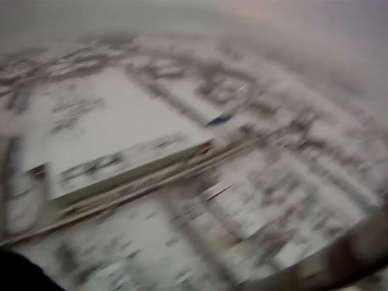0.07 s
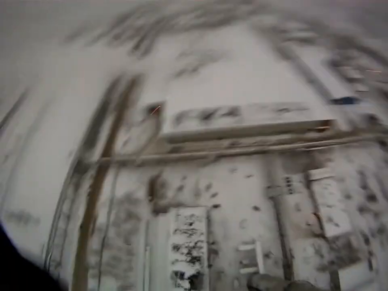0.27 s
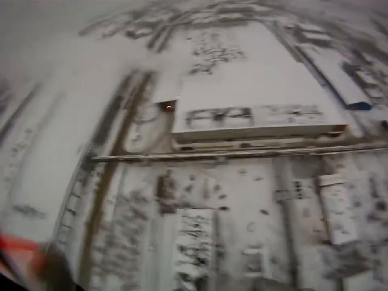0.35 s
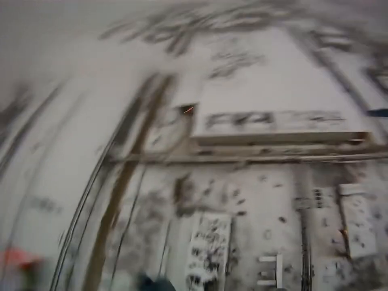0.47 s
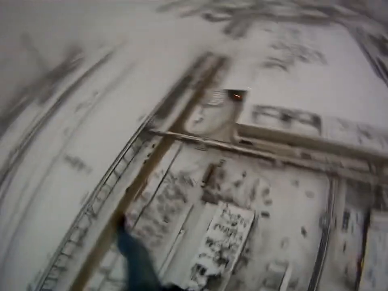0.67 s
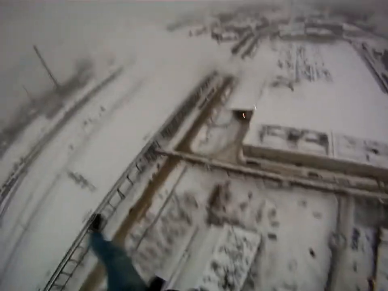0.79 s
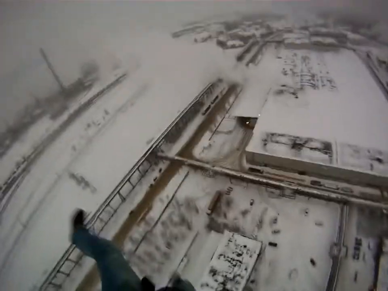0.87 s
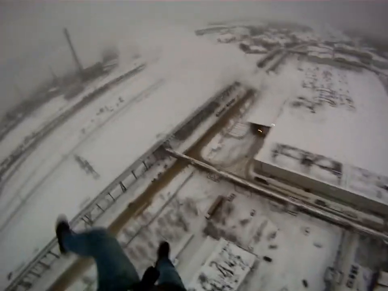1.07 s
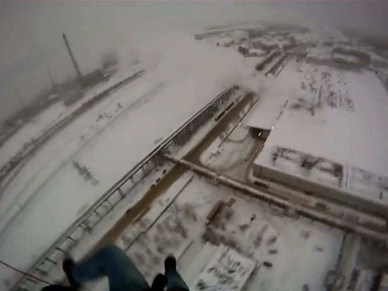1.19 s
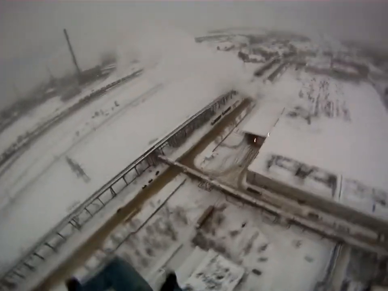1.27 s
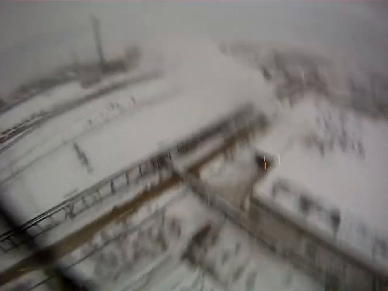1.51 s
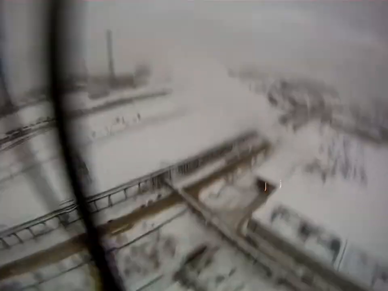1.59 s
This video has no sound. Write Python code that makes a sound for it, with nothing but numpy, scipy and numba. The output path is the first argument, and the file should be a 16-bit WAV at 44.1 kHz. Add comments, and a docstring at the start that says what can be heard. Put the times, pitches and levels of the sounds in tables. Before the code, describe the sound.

Wind swells quickly around a small cased camera worn in a jump, fabric crackling and fluttering; gear snaps sharply near half a second, a loud overloaded knock follows at 0.8, then a thinner steady rush outdoors.

```python
"""Wind swells past a small cased camera in a jump: shaped noise hisses in the case and buffets the mount.
From the start fabric crackles as noise bursts and clothing flutters as shaped noise; a two-tone strap chirps.
Gear knocks, as pulses and rattle into damped modes, begin at 0.43 s; one at 0.8 s overloads the input.
A brief airy whistle of narrow noise follows, then a last knock, crackles and a chirp from 1.1 s.
Gain control rides the mono sound; 12 kHz sampling with held steps mirrors it into the treble."""
import sys
import numpy as np
from scipy import signal
from scipy.fft import rfft, irfft
from scipy.io import wavfile
from scipy.ndimage import uniform_filter1d
from numba import njit

SR = 44100
rng = np.random.default_rng(int(sys.argv[2]) if len(sys.argv) > 2 else 0)


def store_wav(level_fs):
    """Save 16-bit WAV to argv[1]."""
    pcm = np.round(np.clip(np.atleast_2d(level_fs), -1, 1) * 32767)
    wavfile.write(sys.argv[1], SR, pcm.T.astype(np.int16))


def attenuation_scalar(level_db):
    """Turn a level in dB into a linear amplitude multiplier (20 dB per decade)."""
    decades = np.asarray(level_db, float) / 20
    return 10 ** decades


N = 72765

# Mount modes. Each row: frequency in Hz, relative level in dB, t60 in seconds.
MOUNT_MODES = [(108.4, 5.5, 0.11), (230, -5, 0.096)]
# Fabric noise spectrum. Each row: frequency in Hz, relative density in dB per Hz.
FABRIC_SPECTRUM = [(800, -14), (1500, -2.5), (3000, 0), (5000, -8.5), (6000, -8)]


def table(rows):
    """Columns of a table."""
    return np.array(rows, float).T


def unit(x):
    """Scale to rms 1."""
    return x / np.sqrt(np.mean(x ** 2))


def colour(x, points):
    """Shape the spectrum by (Hz, dB) points on a log-frequency axis; -90 dB outside."""
    hz, db = table(points)
    log_hz = np.log(np.arange(N // 2 + 1) * SR / N + 1)
    gain_db = np.interp(log_hz, np.log(hz), db, left=-90, right=-90)
    return irfft(rfft(x) * attenuation_scalar(gain_db), N)


def band(x, hz, width_hz):
    """One resonance."""
    return signal.lfilter(*signal.iirpeak(hz, hz / width_hz, SR), x)


def walk(rate_hz):
    """Random levels held 1 / rate_hz seconds, smoothed twice, rms 1."""
    k = int(SR / rate_hz)
    steps = np.repeat(rng.standard_normal(N // k + 1), k)
    return unit(uniform_filter1d(uniform_filter1d(steps, k), k)[:N])


def ring(x, modes):
    """Exponentially damped modes excited by x."""
    out = 0
    for hz, db, t60_s in modes:
        pole = np.exp(2j * np.pi * hz / SR - np.log(1000) / (t60_s * SR))
        out = out + attenuation_scalar(db) * signal.lfilter([1], [1, -pole], x).real
    return out


def bump(at_s, length_s):
    """Half-sine swell from at_s, lasting length_s."""
    return np.sin(np.pi * np.clip((np.arange(N) / SR - at_s) / length_s, 0, 1))


@njit
def follow(x, attack, release):
    """Peak envelope with separate per-sample attack and release coefficients."""
    y, e = np.empty(len(x)), 0.
    for i in range(len(x)):
        a = abs(x[i])
        e += (a - e) * (attack if a > e else release)
        y[i] = e
    return y


def wind():
    """Eddies hiss in short bursts through the case and its cavity; slower ones buffet the mount."""
    # Wind course. Each row: time in seconds, rush in dB, upper rush re rush in dB, buffet in dB.
    course = [(0, -56.5, 5.5, -44), (.05, -40.5, -17.5, -36.5), (.12, -41, -4, -39), (.2, -32.5, -2.5, -31),
              (.27, -28, -14.5, -32), (.33, -34, -1, -39), (.4, -31, -15, -34), (.48, -31, -14.5, -42.5),
              (.57, -28, -7.5, -38), (.67, -30, -10, -42.5), (.79, -33.5, -11.5, -41),
              (.88, -41.5, -12, -45), (.96, -35, -14, -42), (1.1, -34.5, -11, -44.5),
              (1.25, -37, -7, -40.5), (1.35, -37, -10, -52), (1.5, -38.5, -10, -42.5),
              (1.65, -38, -13, -53)]
    # Noise spectra. Each row: frequency in Hz, relative density in dB per Hz.
    rush_spectrum = [(180, -61), (300, -63), (550, -32.5), (714, -16.5), (825, -22), (989, -16.5),
                     (1100, 1.5), (1200, -2.5), (1430, -4.5), (2130, -6.5), (2600, -23), (3380, -20),
                     (5720, -120)]
    upper_spectrum = [(1410, -2), (2400, -6), (2630, -3.5), (3210, 1), (3670, -4), (3950, -10),
                      (5230, -10.5), (6000, -24), (7800, -54), (13200, -120)]
    buffet_spectrum = [(8.8, -33), (15, 1), (59, -2.5), (108, -3.5), (124, -4), (151, -16), (276, -21),
                       (308, -36), (400, -28.5), (520, -33), (880, -120)]
    cavity_hz, cavity_width_hz, cavity_re_rush_db = 1101, 18.6, -17
    eddy_rate_hz, eddy_spread_db = 120, 1
    buffet_rate_hz, buffet_spread_db = 37, 4
    whistle_at_s, whistle_length_s = 0.847, 0.16
    whistle_hz, whistle_width_hz, whistle_db = 1442, 43, -32.5

    t = np.arange(N) / SR
    s, rush_db, upper_db, buffet_db = table(course)
    eddies = rng.standard_normal(N) * attenuation_scalar(eddy_spread_db * walk(eddy_rate_hz))
    cavity = unit(band(eddies, cavity_hz, cavity_width_hz))
    rush = unit(colour(eddies, rush_spectrum)) + attenuation_scalar(cavity_re_rush_db) * cavity
    rush = rush + attenuation_scalar(np.interp(t, s, upper_db)) * unit(colour(eddies, upper_spectrum))
    slow_eddies = rng.standard_normal(N) * attenuation_scalar(buffet_spread_db * walk(buffet_rate_hz))
    buffet = unit(colour(slow_eddies, buffet_spectrum))
    whistle = unit(band(rng.standard_normal(N), whistle_hz, whistle_width_hz))
    whistle = whistle * bump(whistle_at_s, whistle_length_s)
    out = attenuation_scalar(np.interp(t, s, rush_db)) * rush
    out = out + attenuation_scalar(np.interp(t, s, buffet_db)) * buffet
    return out + attenuation_scalar(whistle_db) * whistle


def flutter():
    """Clothing grits and rustles in the wind; the mount hums on its lowest mode."""
    # Flutter course. Each row: time in seconds, fabric grit in dB, low rustle in dB, mount hum in dB.
    course = [(0, -66, -55, -49), (.1, -50.5, -55, -43), (.2, -44, -46.5, -37), (.35, -37.5, -50.5, -42),
              (.42, -37, -44.5, -36.5), (.6, -45, -50, -57.5), (.78, -47.5, -58.5, -50),
              (.9, -68, -66, -70), (1.15, -62, -60, -57.5), (1.3, -65, -63, -51.5), (1.5, -59, -59.5, -50),
              (1.58, -64, -55, -39.5), (1.65, -54, -66, -45.5)]
    # Rustle spectrum. Each row: frequency in Hz, relative density in dB per Hz.
    rustle_spectrum = [(140, -11), (220, 6), (400, 1), (760, -3.5), (950, -1)]
    grit_rate_hz, grit_limit_db = 220, 10.5
    rustle_rate_hz, rustle_limit_db = 40.35, 6.2
    hum_hz, hum_width_hz = MOUNT_MODES[0][0], 27.3

    s, *levels = table(course)
    grit_db, rustle_db, hum_db = (np.interp(np.arange(N) / SR, s, db) for db in levels)
    grit = rng.standard_normal(N) * attenuation_scalar(grit_limit_db * np.tanh(walk(grit_rate_hz)))
    grit = unit(colour(grit, FABRIC_SPECTRUM))
    rustle = rng.standard_normal(N) * attenuation_scalar(rustle_limit_db * np.tanh(walk(rustle_rate_hz)))
    rustle = unit(colour(rustle, rustle_spectrum))
    hum = band(rng.standard_normal(N), hum_hz, hum_width_hz)
    hum = unit(band(hum, hum_hz, 2 * hum_width_hz))
    return attenuation_scalar(grit_db) * grit + attenuation_scalar(rustle_db) * rustle + attenuation_scalar(hum_db) * hum


def crackles():
    """Fabric crackles: half-sine bursts of broad spiky noise."""
    # Fabric crackles. Each row: start in seconds, level in dB, length in seconds.
    bursts = [(0.03, -39, 0.0064), (0.052, -43, 0.0047), (0.131, -41, .004), (0.142, -31, 0.0029),
              (0.157, -27, 0.0038), (0.184, -32, 0.002), (0.192, -26, 0.0032), (0.225, -27, 0.01),
              (.2748, -29, 0.0044), (0.3207, -26.5, 0.0078), (0.34, -27, 0.0046), (0.359, -31, 0.014),
              (0.412, -47, .003), (.3714, -19.5, 0.005), (0.5271, -12, 0.0013), (0.5311, -24, 0.0023),
              (.533, -21.5, 0.0023), (.629, -37, 0.0036), (1.085, -46, 0.005), (1.135, -41, 0.0071),
              (1.147, -36, 0.0023)]
    grit = unit(colour(rng.laplace(size=N), FABRIC_SPECTRUM))
    return grit * sum(attenuation_scalar(db) * bump(at_s, length_s) for at_s, db, length_s in bursts)


def strap():
    """A strap chirps on two steady tones under a short swell."""
    # Strap chirps. Each row: start in seconds, level in dB, length in seconds, low-tone share (0-1).
    chirps = [(0.369, -11.5, 0.0051, 0.51), (1.132, -30.5, 0.015, 0)]
    # Strap tones. Low and high frequency in Hz.
    tones_hz = (2120, 3300)
    t, phases_rad = np.arange(N) / SR, rng.uniform(0, 2 * np.pi, 2)
    low, high = (np.sin(2 * np.pi * hz * t + p) for hz, p in zip(tones_hz, phases_rad))
    out = np.zeros(N)
    for at_s, db, length_s, share in chirps:
        out += attenuation_scalar(db) * bump(at_s, length_s) ** 2 * (share * low + (1 - share) * high)
    return out


def knocks():
    """A short blow and a rattling contact ring the case; the push thuds in the body and swings the mount."""
    # Case knocks. Each row: start in seconds, ring in dB, thud in dB, mount swing in dB,
    # contact length in seconds, push direction (sign).
    hits = [(0.4319, -7.5, -20.5, -19, 0.002, 1), (.8036, 16, 3.5, -15, 0.0033, 1),
            (0.8284, -13, -24, -23, 0.0031, -1), (0.8509, -26, -24, -34, 0.0021, -1),
            (0.8543, -18, -28.5, -21.5, 0.0037, 1), (0.8567, -18, -26, -33, .005, 1),
            (1.1087, -22, -30.5, -33.5, 0.0026, -1)]
    # Case and body modes. Each row: frequency in Hz, relative level in dB, t60 in seconds.
    case_modes = [(775, -20.5, 0.028), (1355, -2.5, 0.013), (1683, -1, 0.012), (2160, -7, 0.017),
                  (2887, -5.5, 0.0087), (4240, -20.5, 0.025)]
    thud_modes = [(79, -16.5, 0.037), (158, 5.5, 0.018)]
    blow_at_0_db_s, softer_exponent = 0.00029, 0.049  # weaker blows last longer
    rattle_share = 0.46
    body_cut_hz = 81  # the body under the case gives way below this

    sharp, thud, swing = np.zeros(N), np.zeros(N), np.zeros(N)
    rattle = uniform_filter1d(rng.standard_normal(N), size=7)
    for at_s, ring_db, thud_db, swing_db, contact_s, direction in hits:
        shape = bump(at_s, contact_s)
        blow = bump(at_s, blow_at_0_db_s * attenuation_scalar(-softer_exponent * ring_db))
        contact_rattle = rattle_share * rattle * shape / np.sqrt(shape.sum())
        sharp += attenuation_scalar(ring_db) * (contact_rattle - blow / blow.sum())
        push = np.sign(direction) * shape / shape.sum()
        thud += attenuation_scalar(thud_db) * push
        swing += attenuation_scalar(swing_db) * push
    body = ring(thud, thud_modes) + ring(swing, MOUNT_MODES)
    body = signal.lfilter(*signal.butter(2, body_cut_hz, "high", fs=SR), body)
    return ring(sharp, case_modes) + body


def scene():
    """One microphone hears it all."""
    mono = wind() + flutter() + crackles() + strap() + knocks()
    return np.array([mono, mono])


def roll_off(x):
    """The treble ends steeply here."""
    return signal.sosfilt(signal.butter(12, 15940, fs=SR, output="sos"), x)


def record(dry):
    """Gain control, coarse sampling, clipping, held steps and a very slight channel difference."""
    agc_top_db, agc_ratio, agc_attack_s, agc_release_s = -15, 1.83, 0.0063, 0.076
    rate_up, rate_down, hold = 40, 147, 4  # 12 kHz sampling, each step held four times
    top_hz = 15500
    side_db, side_rate_hz = -34.5, 40

    mono = dry[0]
    env = follow(mono, 1 / (agc_attack_s * SR), 1 / (agc_release_s * SR))
    gain = np.minimum(1, attenuation_scalar(agc_top_db) / (env + 1e-9)) ** (1 - 1 / agc_ratio)
    coarse = np.clip(signal.resample_poly(mono * gain, rate_up, rate_down), -1, 1)
    held = signal.resample_poly(np.repeat(coarse, hold), rate_down, rate_up * hold)[:N]
    held = signal.sosfilt(signal.ellip(8, .2, 60, top_hz, fs=SR, output="sos"), held)
    side = attenuation_scalar(side_db) * held * walk(side_rate_hz)
    return roll_off(np.array([held + side, held - side]))


dry = scene()
out = record(dry)
store_wav(out)
```